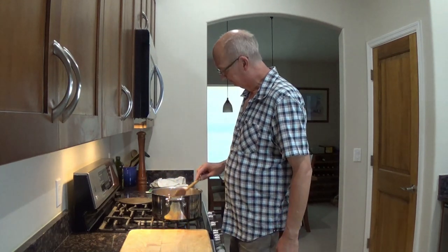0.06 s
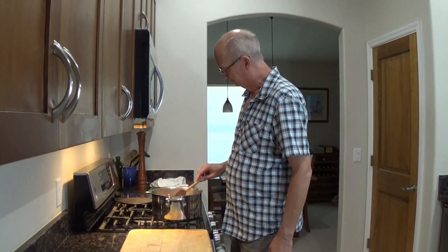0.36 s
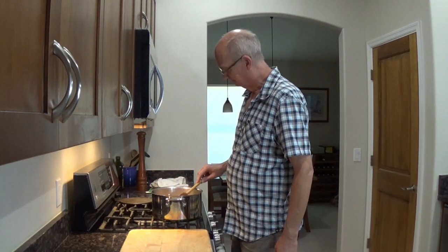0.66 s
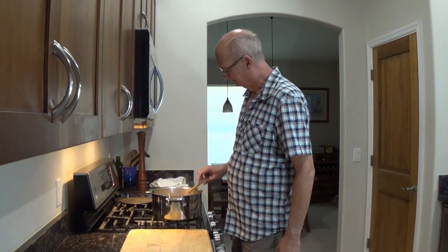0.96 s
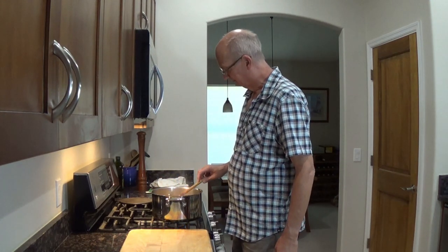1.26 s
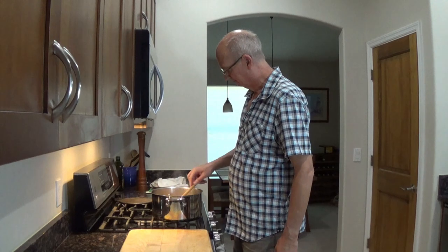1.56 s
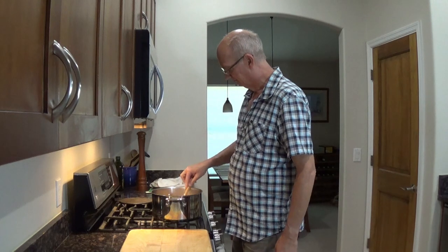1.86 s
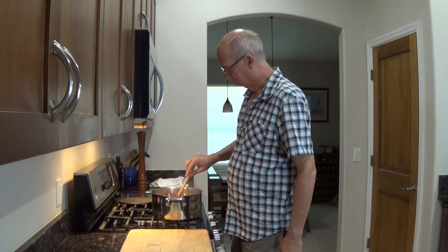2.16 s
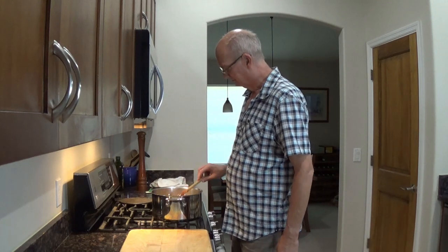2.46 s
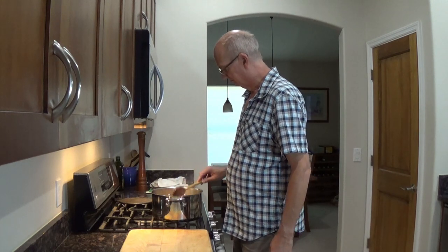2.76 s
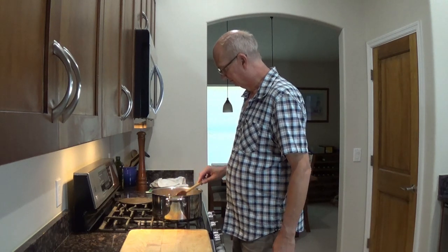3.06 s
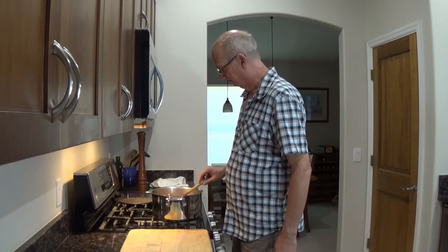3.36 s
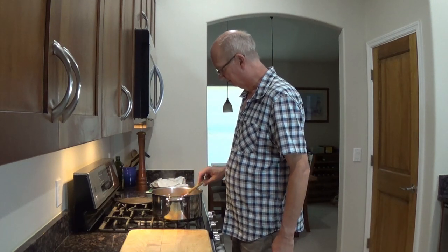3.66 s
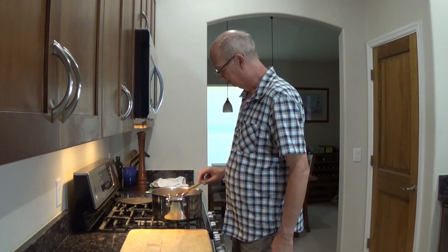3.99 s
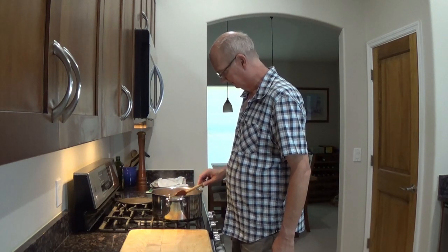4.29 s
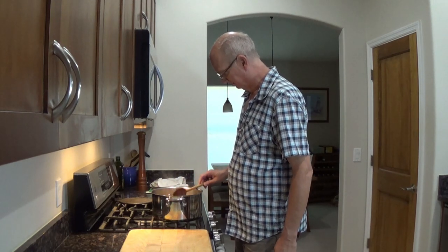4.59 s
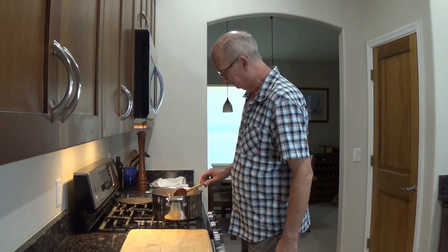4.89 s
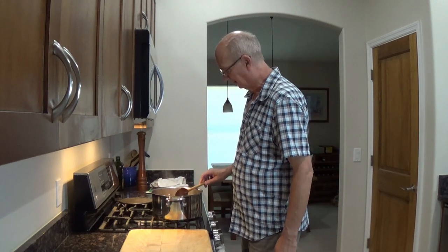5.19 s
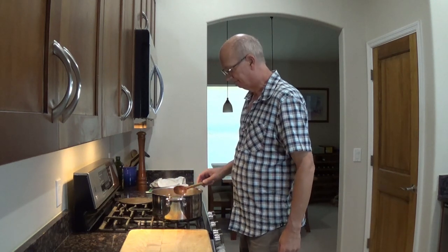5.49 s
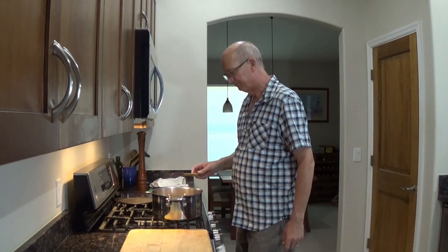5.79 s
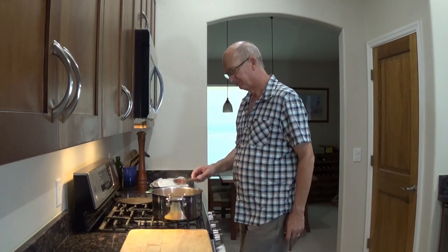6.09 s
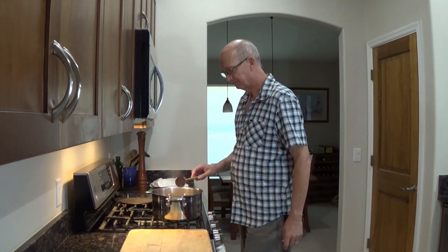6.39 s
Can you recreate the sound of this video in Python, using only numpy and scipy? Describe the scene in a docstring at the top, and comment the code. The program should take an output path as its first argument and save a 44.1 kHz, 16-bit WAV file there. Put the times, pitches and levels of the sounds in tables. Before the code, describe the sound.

A wooden spoon raps sharply on the rim of a steel saucepan in quick runs, over a faint simmer in a kitchen.

```python
"""A kitchen: a wooden spoon is rapped in quick runs on the rim of a full steel saucepan, then set aside.
Each rap is a dry wooden clack plus the short ring of the pan's modes, thrown back by cabinets and room.
Light spoon touches and slides, and a faint sizzling hiss near 5 kHz, are swells of filtered noise.
Burner and simmering pot murmur underneath, with a faint hum and a thin electronic whine."""
import sys
import numpy as np
from scipy import signal
from scipy.fft import rfft
from scipy.io import wavfile
from scipy.ndimage import uniform_filter1d

SR = 44100
rng = np.random.default_rng(int(sys.argv[2]) if len(sys.argv) > 2 else 0)


def file_out(sig):
    """Save sig as 16-bit WAV at sys.argv[1]."""
    # one column per channel
    cols = np.atleast_2d(sig).T
    # limit, then scale
    lim = np.clip(cols, -1, 1)
    pcm = np.round(lim * 32767).astype(np.int16)
    wavfile.write(sys.argv[1], SR, pcm)


N = 284245
HZ = np.fft.rfftfreq(32768, 1 / SR)
# spectrum of spoon, rim and grate without their ringing: freq_hz, level_db
CLACK_SPECTRUM = [(40, -30.5), (80, -25), (130, -13.5), (210, -1.5), (400, -2.5), (1000, 3), (1700, 2.5),
                  (1900, -1.5), (3900, -3), (4400, -6), (7200, -11.5), (10500, -20), (13000, -32),
                  (15500, -41)]


def gain_of(db):
    """Decibels to amplitude."""
    return 10 ** (np.asarray(db) / 20)


def unit_rms(x):
    """Scales to rms 1."""
    return x / np.sqrt(np.mean(x ** 2) + 1e-20)


def curve(points, hz=HZ):
    """Interpolates a table on a log-frequency axis."""
    point_hz, value = np.transpose(points)
    return np.interp(np.log(hz + 1), np.log(point_hz + 1), value)


def add(mix, start_s, sound):
    """Mixes a sound in at start_s."""
    start = round(start_s * SR)
    sound = sound[:, max(-start, 0):]
    part = mix[:, max(start, 0):][:, :sound.shape[1]]
    part += sound[:, :part.shape[1]]


def coloured(x, gain):
    """Minimum-phase filter, gain given on HZ: its peaks ring on after a blow."""
    log_gain = np.log(np.maximum(np.r_[gain, gain[-2:0:-1]], 1e-6))
    taps = np.fft.ifft(np.exp(np.conj(signal.hilbert(log_gain)))).real[:len(HZ) // 2]
    return signal.fftconvolve(x, taps)[:len(x)]


def band_average(power, base_hz=70, share=0.073):
    """Averages a power spectrum over bands that widen with frequency."""
    half_hz = (base_hz + share * HZ) / 2
    total = np.cumsum(power)
    in_band = np.interp(HZ + half_hz, HZ, total) - np.interp(HZ - half_hz, HZ, total)
    return in_band * HZ[1] / (2 * half_hz)


def kitchen(scatter, near_gain, far_gain, direct_db, crisp_db=0, smear_s=0.0042, build_s=0.01):
    """Mid and side of a blow in the room: direct sound, smeared echoes, a tail that dies by band."""
    # spoon seating on the rim, nearby surfaces answering: delay_s, level_db
    echoes = [(.002, -7.5), (.009, -6.5), (0.01, -0.5), (0.0178, -3), (0.021, -11), (0.025, -11.5),
              (0.033, -9.5)]
    # reverberation decay: freq_hz, t60_s
    tail_t60 = [(100, 2.07), (260, 0.47), (700, 0.6457), (1400, 0.5773), (2500, 0.5), (4100, 0.49),
                (5000, 0.51), (6000, 0.5), (8000, 0.38), (13000, 0.61)]
    # reverberation against the echoes: freq_hz, level_db
    tail_level = [(150, -1.5), (300, 7), (500, 3), (1100, -5), (3000, -8.5), (7000, -8), (13000, -10)]
    # stereo width of echoes and of reverberation: freq_hz, side_to_mid_db
    near_width = [(180, -14.5), (500, -3.5), (1000, -10.5), (2000, -11), (4000, -20), (8000, -12.5),
                  (14000, -34)]
    far_width = [(180, -17), (500, -10), (1000, -7.5), (7000, -8.5), (14000, -42.5)]
    t = np.arange(SR) / SR
    # a gentler first touch is duller
    treble_db = curve([(2500, 0), (8000, min(direct_db - 4, 0) + crisp_db)])
    burst = scatter[0, 0, ::-1] * np.exp(-t / (2 * smear_s))
    echo_power = sum(gain_of(db) ** 2 * (t >= s) * np.exp(-abs(t - s) / smear_s) for s, db in echoes)
    near = scatter[0] * np.sqrt(echo_power)
    near[0] += coloured(burst, gain_of(direct_db + treble_db))  # straight ahead: mid only
    hz, age_s, bands = signal.stft(scatter[1], SR, nperseg=512)
    bands *= gain_of(curve(tail_level, hz)[:, None] - 60 * age_s / curve(tail_t60, hz)[:, None])
    far = signal.istft(bands, SR)[1][:, :SR] * (1 - np.exp(-t / build_s))
    # the room spreads a sound in time but favours no band
    powers = abs(rfft(near + far, 2 * len(HZ) - 2)) ** 2
    flat_mid, flat_side = [band_average(power) ** -.5 for power in powers]
    mid = coloured(near[0], near_gain * flat_mid) + coloured(far[0], far_gain * flat_mid)
    side = coloured(near[1], near_gain * flat_side * gain_of(curve(near_width)))
    side += coloured(far[1], far_gain * flat_side * gain_of(curve(far_width)))
    return np.array([mid, side])


def stove(mid_rms_db=-55.5, patchy_db=-0.7):
    """Soft rush of burner and simmering pot, uneven in the lows."""
    # rush spectrum: freq_hz, relative_db
    spectrum = [(15, -52), (25, -52), (48, -8.5), (81, -11), (131, -3.5), (326, -1.5), (415, -3.5),
                (543, -1.5), (709, -5), (769, -7), (833, -6.5), (1500, -12), (4620, -17.5), (5720, -19),
                (15000, -21)]
    # stereo width: freq_hz, side_to_mid_db
    width = [(30, -0.5), (70, -17.5), (220, -19.5), (500, -9.5), (1000, -4.5), (2000, -2.5), (4500, -5),
             (8000, -11.5), (13000, -35)]
    hz = np.fft.rfftfreq(2048, 1 / SR)
    real, imaginary, patches = rng.standard_normal((3, 2, len(hz), N // 512 + 5))
    patches = uniform_filter1d(patches[0], size=24, axis=0)
    patches = unit_rms(uniform_filter1d(patches, size=9, axis=1))
    flicker_db = patchy_db * patches / (1 + hz[:, None] / 2000)
    bands = (real + 1j * imaginary) * gain_of(curve(spectrum, hz)[:, None] + flicker_db)
    bands[1] *= gain_of(curve(width, hz))[:, None]
    rush = signal.istft(bands, nperseg=2048, noverlap=1536)[1][:, :N]
    return rush * gain_of(mid_rms_db) / rush[0].std()


def appliance_hum(waver=.3):
    """Hum and electronic whine: steady tones with drifting phase, mid only."""
    # appliance tones: pitch_hz, rms_db
    tones = [(60, -82.5), (140, -70), (360.7, -69), (419.9, -73), (15735, -68.5)]
    out, t = np.zeros((2, N)), np.arange(N) / SR
    for pitch_hz, rms_db in tones:
        drift_cycles = waver * np.cumsum(rng.standard_normal(N)) / np.sqrt(SR)
        out[0] += gain_of(rms_db) * np.sqrt(2) * np.sin(2 * np.pi * (pitch_hz * t + drift_cycles))
    return out


def touches_and_sizzle(skirt_db=-24):
    """Light spoon touches and slides, plus faint swells of sizzling hiss near 5 kHz, in the room."""
    # touches, slides, hiss: start_s, loudest_rms_db, swell_s, fade_s, centre_hz, width_octaves
    swells = [(1.671, -60.5, 0.0024, 0.011, 7800, .6), (2.05, -68, 0.35, .2, 4800, .15),
              (4.958, -44.5, 0.0037, 0.045, 1660, 0.89), (5.33, -62, 0.31, 0.11, 5040, 0.13),
              (5.89, -53.5, .015, 0.026, 1490, 1.3), (6.19, -46.5, 0.00028, 0.044, 1200, 1.5),
              (6.212, -44.5, 0.001, 0.0035, 600, 0.37)]
    out, t = np.zeros((2, N)), np.arange(SR) / SR
    for start_s, loudest_rms_db, swell_s, fade_s, centre_hz, width_octaves in swells:
        envelope = (1 - np.exp(-t / swell_s)) * np.exp(-t / fade_s) * (1 - t)
        noise = rng.standard_normal(SR) * envelope
        resonance = np.exp(-.5 * (np.log2((HZ + 1) / centre_hz) / width_octaves) ** 2)
        body = resonance + gain_of(skirt_db + curve(CLACK_SPECTRUM))
        room = kitchen(rng.standard_normal((2, 2, SR)), body, body, direct_db=9)
        sound = signal.fftconvolve([noise], room, axes=1)
        loudest_rms = np.sqrt(uniform_filter1d(sound[0] ** 2, size=900).max())
        add(out, start_s, gain_of(loudest_rms_db) * sound / loudest_rms)
    return out


def pan_ring(low_wall_db, high_wall_db, presence_db, low_wall_hz=1166, high_wall_hz=1645):
    """Power of the pan's modes: the contact point favours some, a dull blow misses the upper ones."""
    # pan on its grate: pitch_hz, width_hz, over_clack_db
    modes = [(307, 9, 9.6), (339, 12, 4), (364, 35, 7.6), (473, 26, 9.0), (550, 30, 3), (646, 15, 4.7),
             (741, 11, 5.6), (787, 16, 4.8), (898, 10, 7.8), (1063, 15, 1.3), (1166, 30, 12.5),
             (1255, 19, 8.5), (1343, 37, 0.8), (1510, 20, 3.2), (1584, 29, 6.4), (1645, 36, 2.9),
             (1712, 18, 3), (2194, 58, 6.2), (2342, 28, 5), (2557, 70, 2.6), (3109, 26, 2.2),
             (3361, 19, 4.5), (3643, 85, 8), (5047, 25, 4.2), (5450, 28, 6), (6217, 70, 7.4),
             (6595, 70, 6.9)]
    power = 0
    for pitch_hz, width_hz, db in modes:
        db += low_wall_db * (abs(pitch_hz - low_wall_hz) < 50)
        db += high_wall_db * (abs(pitch_hz - high_wall_hz) < 90)
        db += presence_db * (pitch_hz > 2000)
        power += gain_of(db) ** 2 / (1 + (2 * (HZ - pitch_hz) / width_hz) ** 2)
    return power


def spoon_raps(trim_db=-1, alike=0.38, wood_db=1.47, near_ring_db=2, usual_pause_s=.28):
    """Spoon on rim: force and brightness set the tone, the landing place the balance of the modes."""
    # blows on the pan: start_s, blow_db, bright_db, low_wall_db, high_wall_db
    raps = [(-0.006, 21, -5, -3.5, -1), (0.1559, 20, -0.5, -1.5, -1.5), (0.328, 22.5, -2, 0, 6),
            (0.4921, 21.5, -1, 1.5, 5), (0.6555, 21, -2, 1, 1), (1.8725, 1.4, -16, -9, 6.5),
            (2.668, 19.5, -1, -1.5, 1.5), (2.8585, 20, 1, 0.5, 3.5), (3.054, 23.5, 1.5, -0.5, 2),
            (3.243, 24, 0.5, .5, 0.5), (4.135, 15, 3.5, 2, 6.5), (4.3309, 17, -5.5, -0.5, 4.5),
            (4.6601, 20.5, -1.7, 1, 4), (5.158, 23, 1.5, 4.5, 0.5)]
    out, common = np.zeros((2, N)), rng.standard_normal((2, 2, SR))
    # wall modes and the rim's thin crack stand out close to the pan, less in the reverberation
    far_ring = gain_of(curve([(800, 0), (1100, -7), (1600, -4)])) ** 2
    crack = gain_of(curve([(7000, 0), (13000, 4)]))
    # after a pause the spoon lands squarely and crisply; in a quick run it glances
    pauses_s = np.minimum(np.diff([rap[0] for rap in raps]), 1)
    crispness_db = 6.5 * np.log2(np.r_[pauses_s[0], pauses_s] / usual_pause_s)
    for (start_s, blow_db, bright_db, low_wall_db, high_wall_db), crisp_db in zip(raps, crispness_db):
        # a harder blow has less bass and puts more into the seating than into the first touch
        harder_db = blow_db - 20
        bass_db = 0.27 - 0.18 * harder_db
        first_touch_db = -4 - 0.4 * harder_db
        presence_db = -0.12 + 0.19 * bright_db
        contact_db = curve([(450, bass_db), (850, 0.015), (1700, 0), (3200, presence_db),
                            (6000, bright_db / 2), (11000, bright_db)])
        scatter = np.sqrt(alike) * common + np.sqrt(1 - alike) * rng.standard_normal(common.shape)
        # the wood's broad resonances change with grip and contact point
        ripple = unit_rms(uniform_filter1d(rng.standard_normal(len(HZ)), size=110))
        ripple_db = wood_db * ripple * np.minimum(HZ / 1500, 1)
        clack = gain_of(trim_db + blow_db + contact_db + ripple_db + curve(CLACK_SPECTRUM))
        ring = pan_ring(low_wall_db, high_wall_db, presence_db)
        near_gain = crack * clack * np.sqrt(1 + gain_of(near_ring_db) ** 2 * ring)
        far_gain = clack * np.sqrt(1 + far_ring * ring)
        add(out, start_s, kitchen(scatter, near_gain, far_gain, first_touch_db, crisp_db))
    return out


def scene():
    """Sums the sources in mid and side; returns left and right."""
    mid, side = spoon_raps() + touches_and_sizzle() + stove() + appliance_hum()
    return np.array([mid + side, mid - side])


def record(dry, ceiling=.9, cutoff_hz=15860):
    """Rounds off the highest peaks, then low-passes."""
    rounded = dry / (1 + (dry / ceiling) ** 8) ** (1 / 8)
    lowpass = signal.firwin(1023, cutoff_hz, window=("kaiser", 9), fs=SR)
    return signal.oaconvolve(rounded, lowpass[None], "same")


dry = scene()
out = record(dry)
file_out(out)
```